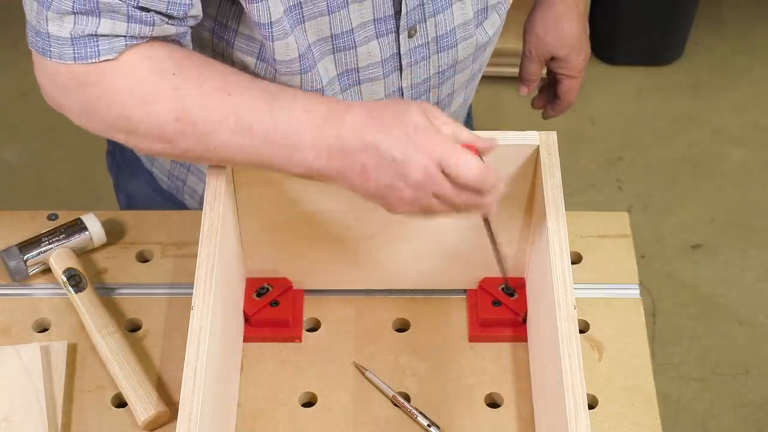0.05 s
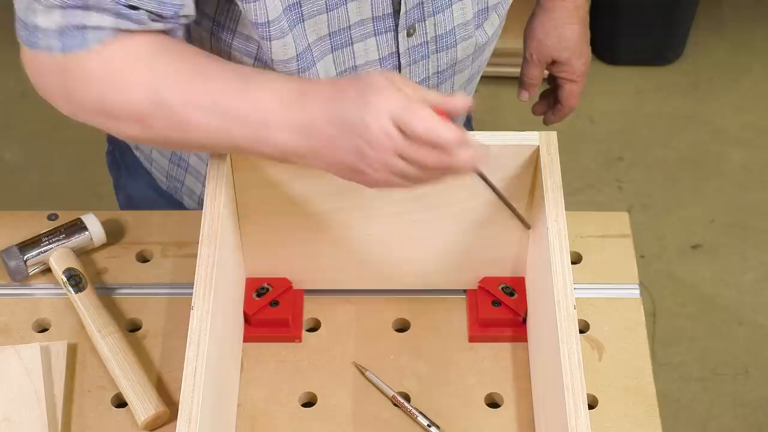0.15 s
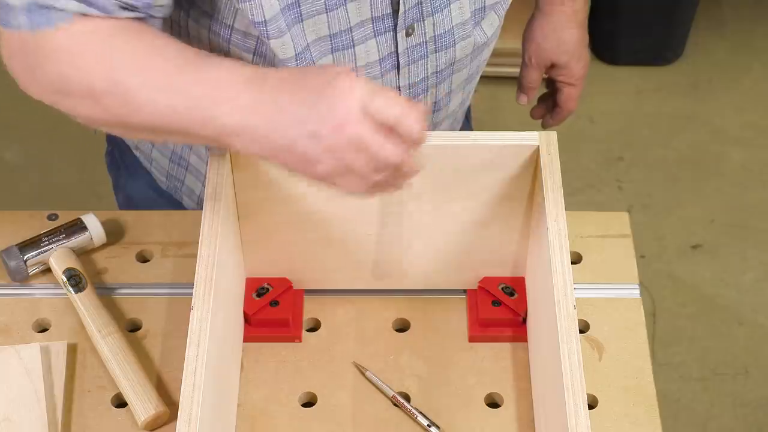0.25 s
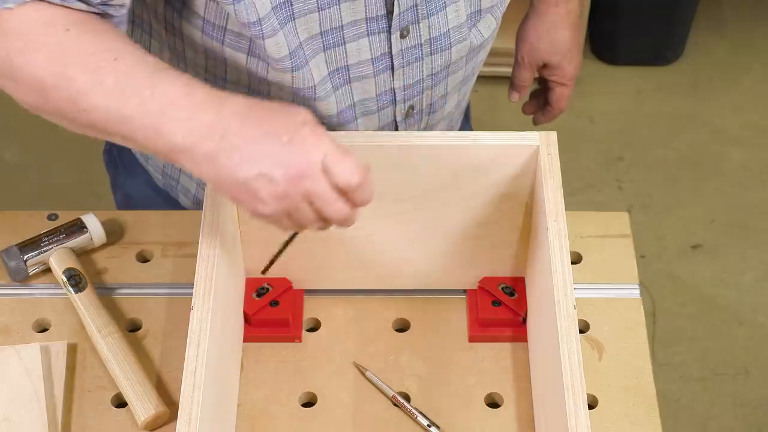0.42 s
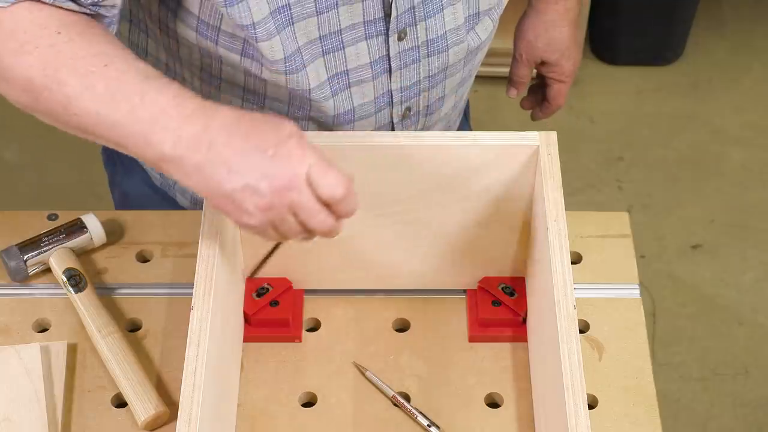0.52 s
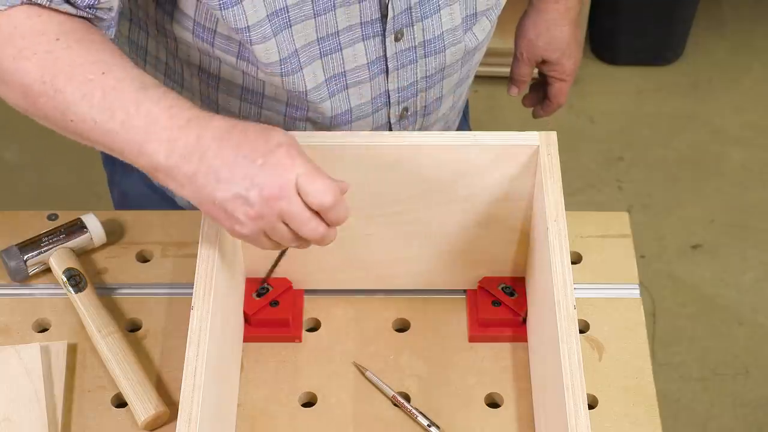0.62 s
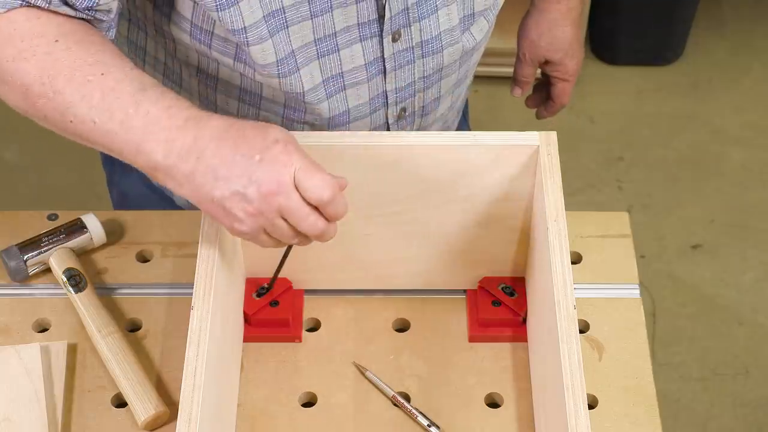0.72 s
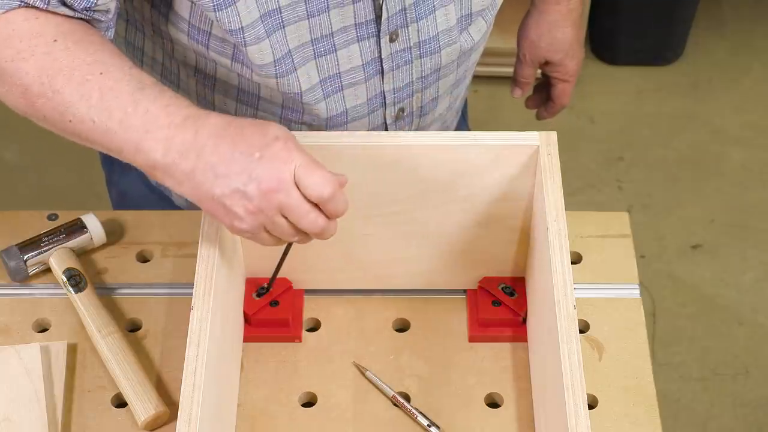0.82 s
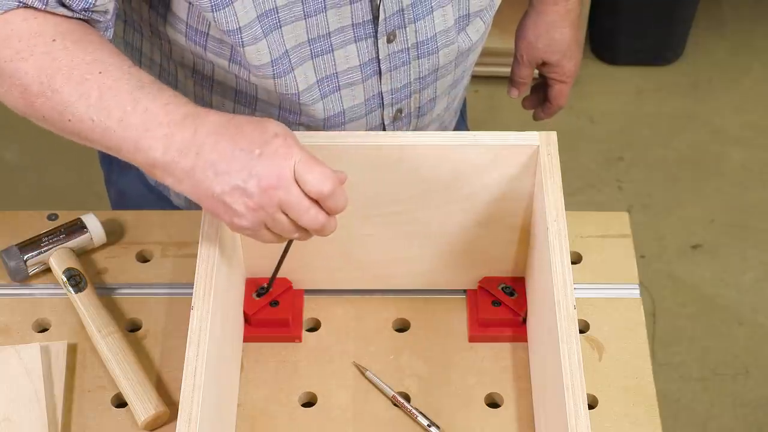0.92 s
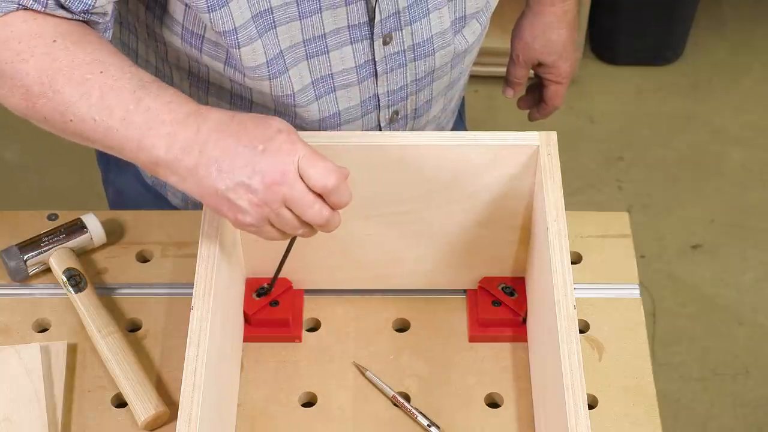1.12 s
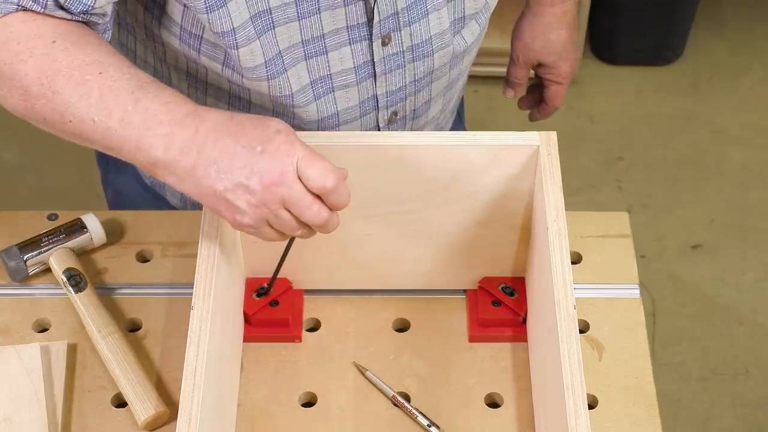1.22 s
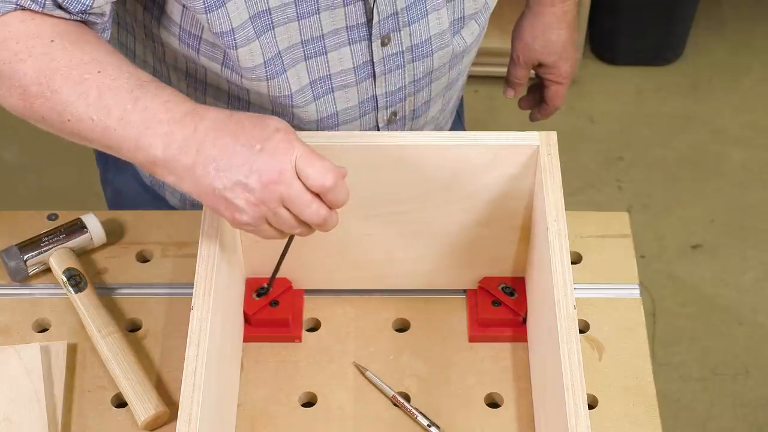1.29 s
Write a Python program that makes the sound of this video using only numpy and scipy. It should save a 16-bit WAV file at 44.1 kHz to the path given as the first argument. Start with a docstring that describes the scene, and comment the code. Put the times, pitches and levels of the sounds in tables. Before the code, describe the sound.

Small steel wrench contacts follow a dull, loud double knock of a wooden box: a bright tap, softer ticks, a faint scrape and a seating click. Close pickup, short room tail, low rumble early on.

```python
"""Under faint hiss and a low rumble that swells early and then dies away, a plywood box knocks several times as
it rocks and settles. A hex wrench, moved from one clamp bolt to the next, then taps the clamp and drops into
the bolt head. Its tip scrapes, then clicks as it seats, with soft rubbing of hand and tool around it. Contacts
are decaying modes and noise bursts, scrapes are grainy noise through resonances, and a small workshop adds a
tail of decaying noise bands."""
import sys
import numpy as np
from scipy import signal
from scipy.fft import rfft, irfft
from scipy.io import wavfile

SR = 44100
rng = np.random.default_rng(int(sys.argv[2]) if len(sys.argv) > 2 else 0)


def inscribe(sig):
    """Save sig as 16-bit PCM at rate SR to the path in sys.argv[1].

    A 1-D sig is mono; a 2-D sig holds one channel per row.
    Samples are clipped to [-1, 1] before scaling.
    """
    pcm = np.round(np.clip(np.atleast_2d(sig).T, -1, 1) * 32767)
    wavfile.write(sys.argv[1], SR, pcm.astype(np.int16))


N = 59535  # length in samples

# Wrench contacts; the spot that is hit favours some modes. Each row: start in seconds, steel ring in dB,
# tick in dB, panel modes in dB, wooden clatter in dB, bench thud in dB, low-pass corner in Hz,
# favoured steel pitch in Hz, favoured panel pitch in Hz.
WRENCH_CONTACTS = [(0.7094, -41, -70, -46, -43, -51, 1520, 3330, 456),
                   (0.7685, -28, -35.5, -43.5, -34.5, -55, 11300, 3200, 956),
                   (0.798, -49, -60, -48, -48, -54, 2920, 1650, 392),
                   (0.8634, -49, -42.5, -50.5, -52, -79, 12960, 2700, 311),
                   (1.136, -46, -39, -53, -49.5, -56.5, 11100, 2640, 430),
                   (1.2742, -49, -41, -49, -52.5, -48.5, 9700, 1870, 445),
                   (1.291, -61, -68, -57, -70, -59, 1230, 1660, 460)]
# Knocks of the box. Each row: start in seconds, panel modes in dB, wooden clatter in dB, crack in dB,
# low-pass corner of modes and clatter in Hz, favoured panel pitch in Hz.
BOX_KNOCKS = [(0.1655, -58.5, -50.5, -49, 6000, 327), (0.2025, -30.5, -24, -40.5, 3620, 348),
              (.2147, -42.5, -25.5, -31.5, 2850, 795), (0.2176, -21.5, -30.5, -74, 850, 540),
              (0.2334, -32, -44.5, -64, 790, 515), (.294, -50.5, -55.5, -57, 1810, 340)]
# Slides of the tip, swelling and fading as a bell curve. Each row: middle in seconds,
# standard deviation in seconds, steel in dB, wood in dB.
TIP_SLIDES = [(0.164, 0.0092, -64, -53), (1.047, 0.01, -61.5, -66), (1.064, 0.0065, -56, -66),
              (1.079, 0.0072, -58.5, -75), (1.262, 0.0091, -70, -55)]
# Soft rubbing of hand and tool. Each row: time in seconds, level in dB.
RUB_LEVEL = [(0, -67.5), (.06, -75), (.2, -74.5), (.6, -80), (.95, -78), (1.1, -64), (1.22, -66.5),
             (1.35, -76)]

# Modes of wrench and bolt, of the box panels, and of the sliding tip.
# Each row: nominal pitch in Hz, relative level in dB, 60 dB decay time in seconds.
STEEL_MODES = [(1427, -19, 0.052), (1663, -3, 0.057), (1670, -1, 0.07), (1835, -14.5, 0.078),
               (2550, -8.5, 0.054), (2637, -9.5, 0.062), (3208, -11, 0.034), (3315, -7, 0.042),
               (3373, -14, 0.068), (3630, -29, 0.023), (4290, -12.5, 0.038), (4640, -16, 0.054),
               (5990, -7, 0.033), (8930, -9.5, 0.028)]
PANEL_MODES = [(221, -26, 0.15), (294.4, -16, .16), (338.3, -13.5, 0.21), (379.5, -9, 0.14),
               (413.6, -9.5, 0.17), (463, -16, 0.1), (497.7, -3, .11), (547.7, -17.5, 0.16),
               (667.4, -25.5, 0.42), (680.4, -22, 0.16), (832, -12.5, 0.1), (883, -19.5, 0.14),
               (1088, -13.5, 0.14)]
SLIDE_MODES = [(1468, 4.5, 0.029), (1750, -6, .015), (2124, 4.5, 0.038), (2410, 1.5, 0.02), (3150, 4, .015)]

# Noise colours: dense plywood ringing, steel tick, dull bench top under the pressing hand, room air.
# Each row: frequency in Hz, relative spectrum level in dB per Hz.
CLATTER_COLOUR = [(30, -39), (100, 10), (200, -8.5), (400, 6), (620, -1.5), (850, 4.5), (1300, -1.5),
                  (1700, 4.5), (2400, 2.5), (3600, -9), (6000, -14), (9000, -19), (15000, -14)]
TICK_COLOUR = [(100, -34), (500, -2), (1500, 6.5), (2600, 8), (4000, 5), (6000, 2), (9000, -2), (12000, -2),
               (16000, -17)]
THUD_COLOUR = [(40, -5), (90, -11), (150, -7.5), (215, 0), (300, -16.5), (600, -33), (2000, -70)]
AIR_COLOUR = [(25, 13), (60, 18), (120, 19), (250, 15), (450, 16), (700, 4.5), (2000, 0), (4000, -1.5),
              (9000, -3), (15000, -2.5)]

# Workshop reverberation. Each row: frequency in Hz, half-octave band level in dB,
# 60 dB decay time in seconds.
ROOM_BANDS = [(119.6, -1.5, 0.25), (334, -16, 0.69), (536, -20.5, 0.63), (795, -9, 0.62),
              (1780, -9.5, 0.49), (2300, -16.5, 0.65), (3400, -15, 0.51), (6960, -11.5, 0.52),
              (14000, -27, .2)]
# Low rumble. Each row: time in seconds, level in dB.
RUMBLE_LEVEL = [(0, -72), (.1, -60), (.3, -59.5), (.5, -62.5), (0.701, -93), (1.35, -106)]

STEEL_RISE_S, PANEL_RISE_S, TICK_RISE_S, CLATTER_RISE_S = 0.002, 0.0021, 0.00087, 0.0002
CLATTER_T60_S, TICK_T60_S, CRACK_T60_S, THUD_T60_S, SLIDE_HISS_T60_S = 0.078, 0.036, 0.012, 0.075, 0.0091
DETUNE_FRACTION, STRIKE_SPREAD_DB = 0.003, 1.5  # standard deviations from strike to strike
STEEL_FAVOUR_DB, PANEL_FAVOUR_DB, FAVOUR_OCTAVES = 9.5, 10.5, 0.2
BOX_LOW_HZ, CRACK_TOP_HZ, RUMBLE_HZ, TOP_HZ = 202, 8800, 55.4, 15900  # filter corners
SCRAPE_GRAIN_DB, SLIDE_HISS_DB = 4, 1
ROOM_DELAY_S = 0.004  # build-up of the tail
AIR_DB = -70


def knocks():
    """The box knocks and settles; each blow has its own brightness and amount of crack."""
    out = np.zeros(N)
    for start, panel_db, clatter_db, crack_db, corner_hz, panel_hz in BOX_KNOCKS:
        blow = lowpass(box(panel_db, clatter_db, panel_hz), corner_hz)
        crack = lowpass(noise(TICK_COLOUR) * fade(CRACK_T60_S), CRACK_TOP_HZ)
        add(out, start, blow + undb(crack_db) * crack)
    return out


def clicks():
    """Steel meets the bolt: a tick, a short ring, the box and the bench beneath."""
    out = np.zeros(N)
    for (start, ring_db, tick_db, panel_db, clatter_db, thud_db,
         corner_hz, steel_hz, panel_hz) in WRENCH_CONTACTS:
        steel = undb(ring_db) * ring(STEEL_MODES, STEEL_RISE_S, steel_hz, STEEL_FAVOUR_DB)
        tick = undb(tick_db) * noise(TICK_COLOUR) * fade(TICK_T60_S) * onset(TICK_RISE_S)
        thud = undb(thud_db) * noise(THUD_COLOUR) * fade(THUD_T60_S) * onset(TICK_RISE_S)
        contact = steel + tick + box(panel_db, clatter_db, panel_hz) + thud
        add(out, start, lowpass(contact, corner_hz))
    return out


def box(panel_db, clatter_db, favoured_hz):
    """One blow on the plywood: panel modes under dense, short clatter; the small box radiates little bass."""
    clatter = noise(CLATTER_COLOUR) * fade(CLATTER_T60_S) * onset(CLATTER_RISE_S)
    panels = ring(PANEL_MODES, PANEL_RISE_S, favoured_hz, PANEL_FAVOUR_DB)
    blow = undb(panel_db) * panels + undb(clatter_db) * clatter
    return signal.sosfilt(signal.butter(2, BOX_LOW_HZ, "high", fs=SR, output="sos"), blow)


def scrapes():
    """Grainy friction on steel and wood as the tip slides, and soft rubbing carried by the panels."""
    t = np.arange(N) / SR
    # Random loud grains stand out of the friction noise
    friction = rng.standard_normal(N)
    grains = friction * undb(SCRAPE_GRAIN_DB * rng.exponential(size=N).clip(0, 7))

    def rubbed(body):
        """Friction grains excite a resonant body; the result has rms 1."""
        return unit(signal.fftconvolve(grains, body)[:N])

    slide_ring = ring(SLIDE_MODES, TICK_RISE_S)
    hiss = undb(SLIDE_HISS_DB) * noise(TICK_COLOUR) * fade(SLIDE_HISS_T60_S)
    steel = rubbed(slide_ring + hiss)
    # For rubbed bodies only the balance of panel and clatter matters
    wood = rubbed(box(panel_db=9.5, clatter_db=1.5, favoured_hz=353))
    rubbing = rubbed(box(panel_db=1, clatter_db=-2, favoured_hz=215))
    out = rubbing * undb(np.interp(t, *np.array(RUB_LEVEL).T))
    for middle, spread, steel_db, wood_db in TIP_SLIDES:
        swell = np.exp(-.5 * ((t - middle) / spread) ** 2)
        out += swell * (undb(steel_db) * steel + undb(wood_db) * wood)
    return out


def ring(modes, rise, favoured_hz=1000, favour_db=0):
    """Modes build up and die away, boosted near the favoured pitch and a little different at each strike."""
    t, out = np.arange(N) / SR, 0
    variations = rng.standard_normal((len(modes), 2))
    for (hz, db, t60), (detune, size) in zip(modes, variations):
        closeness = np.exp(-.5 * (np.log2(hz / favoured_hz) / FAVOUR_OCTAVES) ** 2)
        mode_db = db + STRIKE_SPREAD_DB * size + favour_db * closeness
        mode_hz = hz * (1 + DETUNE_FRACTION * detune)
        tone = np.sin(2 * np.pi * (mode_hz * t + rng.random()))
        out = out + undb(mode_db) * fade(t60) * tone
    return out * onset(rise)


def undb(db):
    """Decibels to gain."""
    return 10 ** (np.asarray(db) / 20)


def unit(x):
    """Scale to rms 1."""
    return x / np.sqrt(np.mean(x ** 2))


def noise(points):
    """Noise of rms 1 whose spectrum follows (Hz, dB) points."""
    hz, db = np.array(points).T
    f = np.arange(N // 2 + 1) * SR / N
    colour = undb(np.interp(np.log(f + 1), np.log(hz), db))  # + 1 avoids log of zero
    return unit(irfft(rfft(rng.standard_normal(N)) * colour, N))


def lowpass(x, hz):
    """Two-pole low-pass."""
    return signal.sosfilt(signal.butter(2, min(hz, SR / 2 - 1), fs=SR, output="sos"), x)


def onset(rise):
    """Exponential build-up with a time constant in seconds."""
    return 1 - np.exp(-np.arange(N) / SR / rise)


def fade(t60):
    """Exponential decay by 60 dB in t60 seconds."""
    return np.exp(-np.log(1000) * np.arange(N) / SR / t60)


def add(out, start, x):
    """Mix a sound in from a given time."""
    i = int(start * SR)
    out[i:] += x[:N - i]


def workshop(x):
    """Diffuse reverberation: half-octave noise bands, each with its own level and decay."""
    hz, db, t60 = np.array(ROOM_BANDS).T
    f, t = np.arange(N // 2 + 1) * SR / N, np.arange(N) / SR
    white, tail = rfft(rng.standard_normal(N)), 0
    build_up = 1 - np.exp(-(t / ROOM_DELAY_S) ** 2)
    for low in 60 * 2 ** np.arange(0, 8.5, .5):
        centre = np.log(low * np.sqrt(np.sqrt(2)))
        band_db = np.interp(centre, np.log(hz), db)
        shape = fade(np.interp(centre, np.log(hz), t60)) * build_up
        band = irfft(white * (f >= low) * (f < low * np.sqrt(2)), N)
        tail = tail + undb(band_db) * band * shape / np.sqrt(np.sum(shape ** 2))
    return x + signal.fftconvolve(x, tail)[:N]


def background():
    """Steady noise of room air, and low-passed noise as a rumble that swells and dies down."""
    rumble = unit(lowpass(noise([(10, -6), (30, -0.5), (200, -2)]), RUMBLE_HZ))
    rumble_db = np.interp(np.arange(N) / SR, *np.array(RUMBLE_LEVEL).T)
    return undb(AIR_DB) * noise(AIR_COLOUR) + rumble * undb(rumble_db)


def scene():
    """Box and wrench in the workshop, over the background."""
    contacts = knocks() + clicks() + scrapes()
    return (workshop(contacts) + background())[None]


def record(dry):
    """A steep low-pass cuts the top of the treble."""
    return signal.sosfilt(signal.ellip(10, .2, 70, TOP_HZ, fs=SR, output="sos"), dry)


dry = scene()
out = record(dry)
inscribe(out)
```